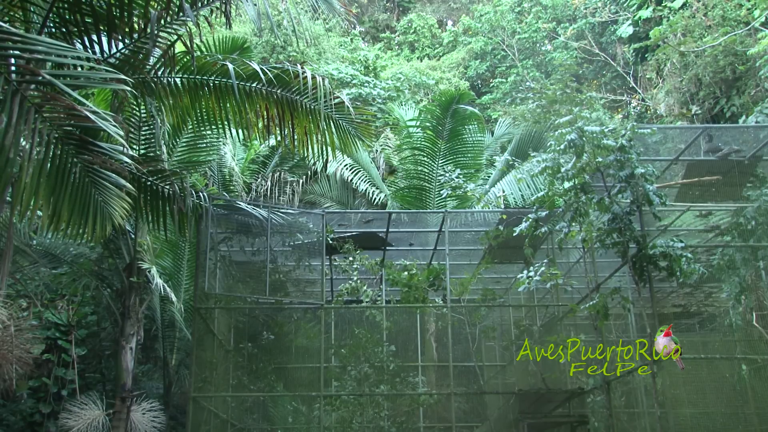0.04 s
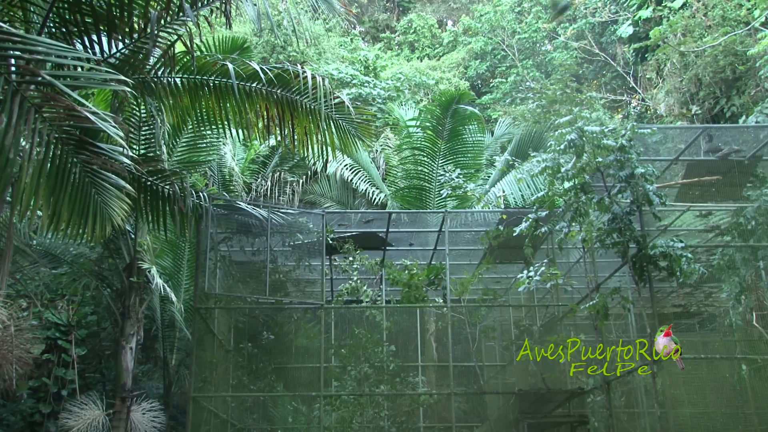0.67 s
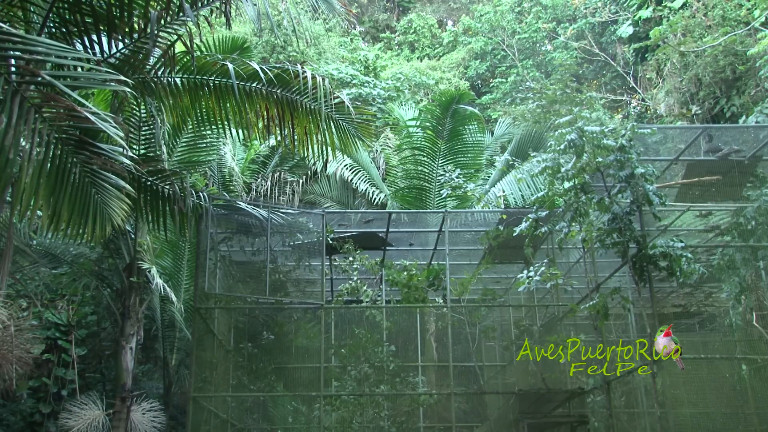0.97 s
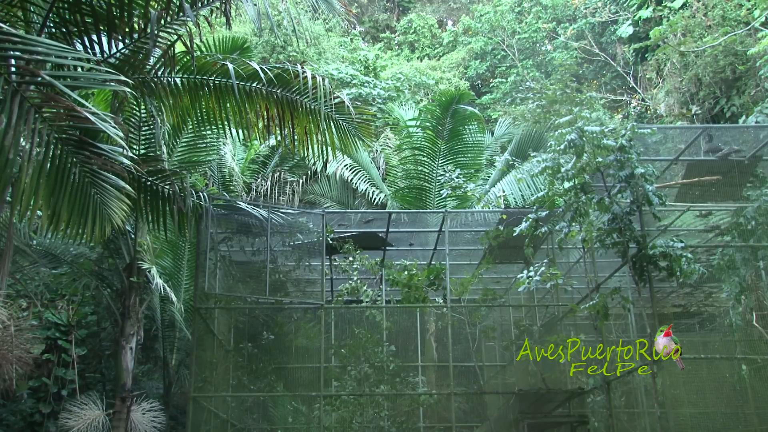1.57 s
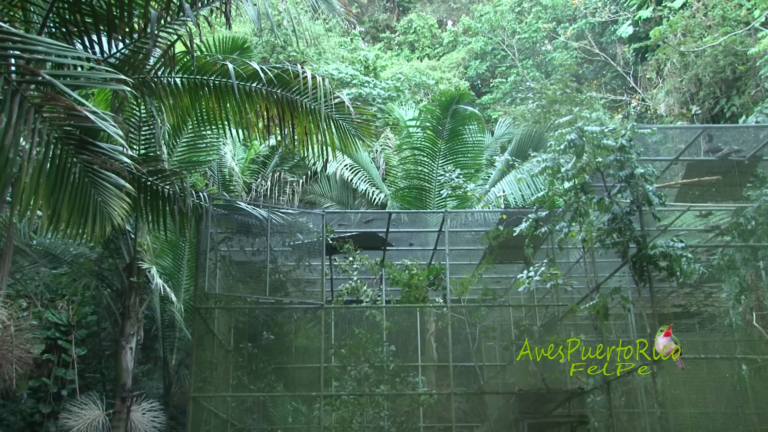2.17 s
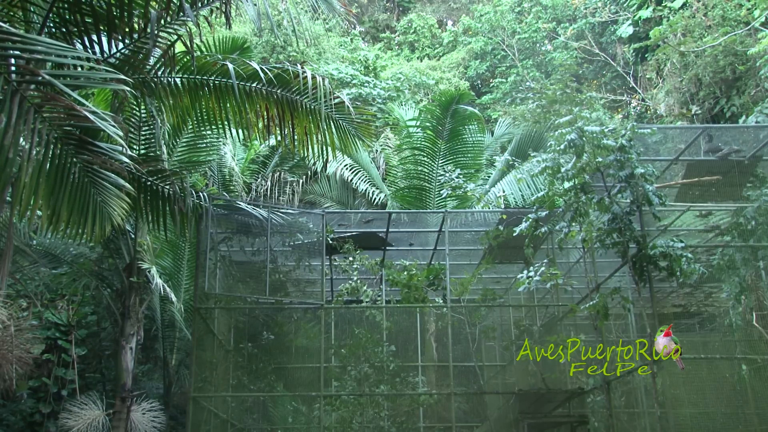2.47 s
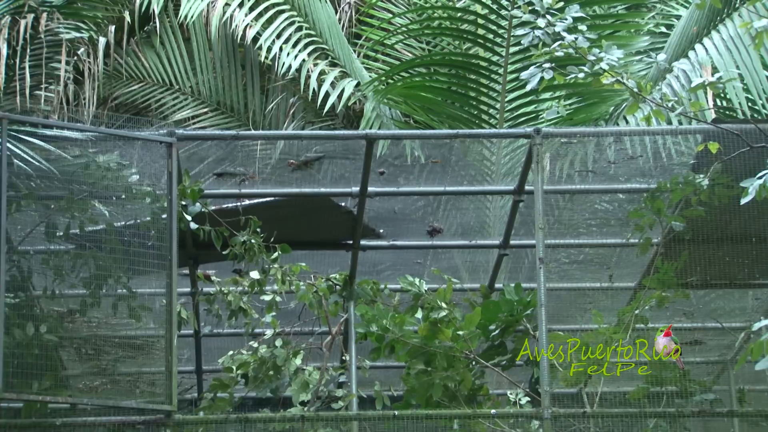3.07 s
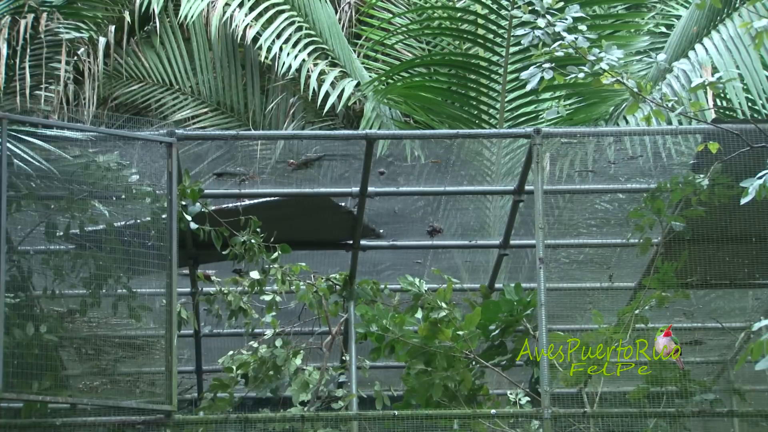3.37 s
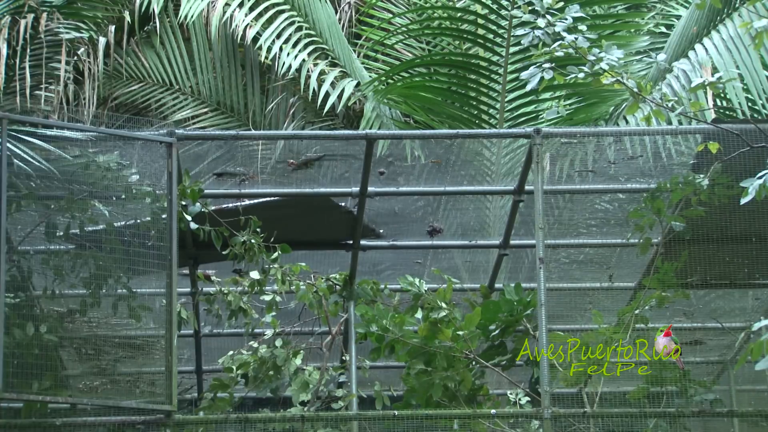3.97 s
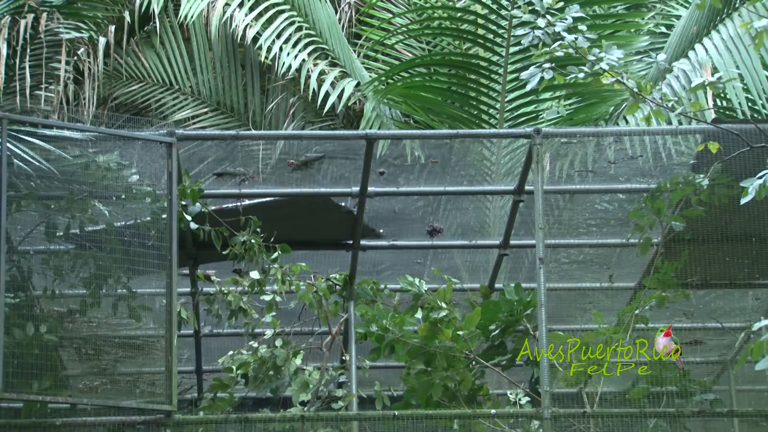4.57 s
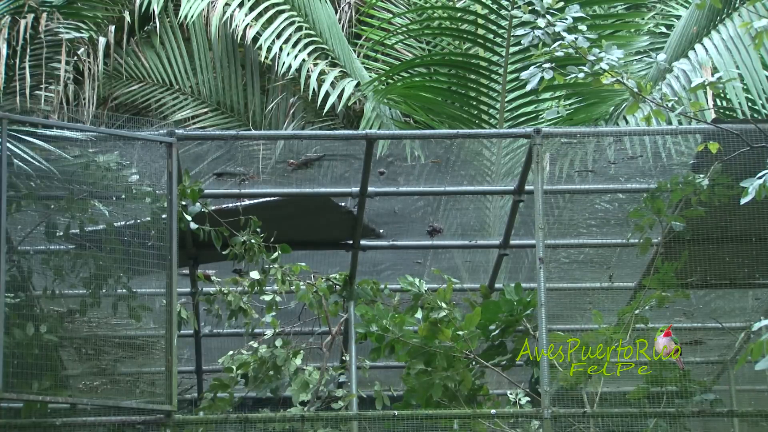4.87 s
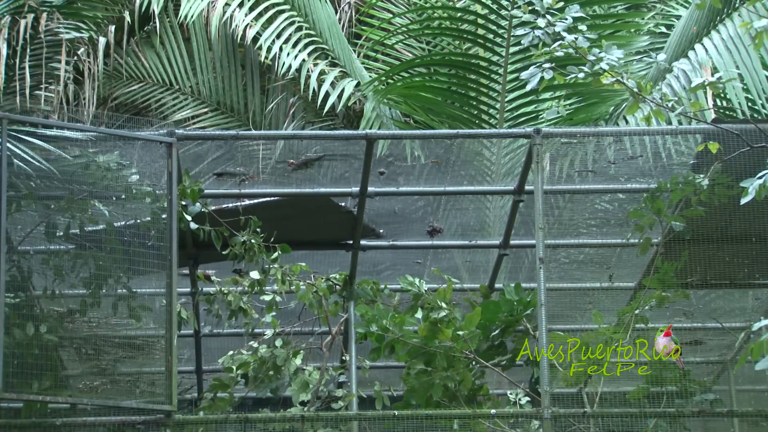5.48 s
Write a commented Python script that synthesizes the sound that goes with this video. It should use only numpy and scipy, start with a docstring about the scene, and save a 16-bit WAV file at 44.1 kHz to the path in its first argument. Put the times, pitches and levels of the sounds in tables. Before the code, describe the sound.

A soft forest hiss and the blurred chatter of distant parrots run throughout. Some way off, parrots give short harsh squawks, low wails and hoarse whoops, each echoing briefly among the trees. A few light drops tap on leaves in the first second or so, and once more near 5 seconds. At about 1.4 seconds a tree frog, close and slightly to the right, gives a loud, pure, level whistle, followed at 1.7 by a higher rising note. Two raspy parrot screeches come at 2.4 and 2.8 seconds, then a falling yelp at 3.2. The frog repeats its two notes at 3.7 and 4 seconds, again far louder than everything else. Another yelp follows at 4.3, and a parrot cry climbs in steps among squawks around 5.3. Small birds add faint, thin, very high notes here and there.

```python
"""Parrots and a tree frog in a wet forest

Some way off, an aviary of parrots squawks, wails, yelps and screeches: buzzing membranes, coloured by
throat and beak, with the trees answering each call. Close by, a tree frog's vocal sac twice sounds a level
whistle, then a rising one. Small birds lisp in the canopy, drops tap on leaves, the forest hisses softly."""
import sys
import numpy as np
from scipy import signal
from scipy.fft import rfft, irfft, next_fast_len
from scipy.io import wavfile
from scipy.ndimage import uniform_filter1d, map_coordinates

SR = 44100
rng = np.random.default_rng(int(sys.argv[2]) if len(sys.argv) > 2 else 0)


def persist_wave(psi):
    """Save psi, clipped to +-1, as 16-bit WAV."""
    counts = np.round(np.clip(psi, -1, 1) * 32767).astype(np.int16)
    wavfile.write(sys.argv[1], SR, np.atleast_2d(counts).T)


N = 244314

# stereo width of the ambience: f/Hz, left-right correlation
STEREO_LIKENESS = [(60, 1), (150, 0.46), (600, 0.7), (1500, 0.14), (8000, 0.59)]
# reverb of the trees at full length: f/Hz, t60/s
TREE_DECAY = [(200, 0.33), (1200, 0.49), (2000, .7), (2780, 1.25), (4000, .75), (6000, 0.72), (12000, 0.2)]
# EQ of the forest hiss: f/Hz, level/dB
HISS_EQ = [(15, -22), (25, -16), (81, -2.5), (180, -8), (539, -2), (1450, -7), (1610, 1.5), (1990, -8.5),
           (2530, -10), (3310, -35.5), (4810, -16.5), (8200, -34), (11000, -33), (13600, -35),
           (14800, -60.5)]
# EQ of the far chatter: f/Hz, level/dB
CHATTER_EQ = [(200, -33), (550, -13), (1250, 2), (2100, -2), (2650, 3), (3200, -0.5), (5500, -6),
              (8500, -11.5), (12000, -33)]
# fader ride of the far chatter: t/s, level/dB
CHATTER_RIDE = [(0, -53.5), (.3, -58), (.5, -48), (.85, -52.5), (1.25, -54), (1.901, -48.5), (2.249, -51.5),
                (2.55, -43), (2.8, -42), (3.151, -48.5), (3.602, -58), (3.999, -53.5), (4.3, -44.5),
                (4.7, -53), (5.051, -45.5), (5.2, -50.5), (5.54, -63.5)]
# pan of the flock's sound: t/s, left minus right/dB
FLOCK_PAN = [(0, -4.5), (1.201, -3), (2, -3), (2.6, -2), (3, -3), (3.25, 0), (4.3, -0.7), (4.9, -0.6),
             (5.4, 0)]
# a parrot's throat: f/Hz, level/dB
THROAT_EQ = [(300, -14), (550, -2), (900, -3), (1300, 0.5), (2000, 5.5), (2750, 6), (3500, 2), (5000, 1.5),
             (6800, -9), (8500, -19), (11000, -33), (15000, -47.5)]
# harsh squawks: t/s, length/s, pitch/Hz, level/dB, roughness, beak/Hz, brightness/(dB per octave)
SQUAWKS = [ (0.124, 0.12, 1138, -50, 0.92, 2500, -38), (0.341, 0.07, 845, -48, 0.87, 1600, -5),
           (0.614, 0.12, 1302, -47, 0.74, 2540, -4), (1.299, 0.048, 1029, -47, 0.5, 2360, -5),
           (1.359, 0.19, 1050, -42.5, 0.92, 2930, 0), (1.632, 0.19, 1017, -40, 0.74, 2450, -1.5),
           (1.933, 0.031, 990, -41, 0.2, 2070, -10), (1.96, 0.036, 1061, -41, 0.4, 2160, 1),
           (1.995, 0.0506, 991, -36, 0.35, 2680, -1), (2.052, 0.14, 1000, -53, 0.52, 3950, 4),
           (2.466, 0.08, 1320, -44, 0.5, 1320, 1), (2.618, 0.11, 1310, -51, 0.39, 1300, -20),
           (3.717, 0.17, 1230, -47, 0.6, 4500, -5.5), (4.517, 0.034, 1280, -44.5, 0.72, 2370, 5.5),
           (4.981, 0.056, 946, -41, 0.92, 1890, 0), (5.332, 0.061, 865.5, -38, 0.88, 1800, 1),
           (5.386, 0.11, 1067, -44, 0.93, 3230, 5)]
# drops on leaves: t/s, level/dB, knock trim/dB
DROPS = [(0.202, -37.5, -24), (0.24, -40.5, -8.5), (0.255, -33.5, -18), (0.3247, -37, -15.5),
         (0.3668, -41.5, -15), (0.933, -38.5, -16.5), (1.004, -37, -28.5), (1.0684, -44, -10.5),
         (1.0831, -41, -16.5), (5.0631, -36.5, -23)]
# a drop's splash: f/Hz, level/dB
SPLASH_EQ = [(300, -52), (2000, 5.5), (3500, 1), (8000, -8), (14000, -29)]
# modes of an average leaf: f/Hz, level/dB, t60/s
LEAF_MODES = [(590, 0, 0.06), (1220, 7, 0.03), (1700, 2, 0.04)]
# thin notes of small birds: t/s, length/s, start/Hz, end/Hz, level/dB
LISPS = [(0.371, 0.034, 8460, 7450, -40), (1.583, 0.19, 8430, 5400, -43), (2.267, 0.086, 8140, 7400, -35.5),
         (2.687, 0.063, 8850, 8940, -39.5), (3.006, 0.14, 9900, 9470, -46.5),
         (4.468, 0.093, 8270, 5980, -32.5), (4.653, 0.084, 9040, 8790, -39)]
# low wails: t/s, length/s, start/Hz, held pitch/Hz, drop as a share of it, level/dB, roughness, beak/Hz
WAILS = [(0.528, .24, 560, 633, 0.27, -46, 1.15, 1160), (1.691, 0.13, 643, 586, 0.51, -41, 0.25, 1200),
         (2.754, 0.13, 648, 683, 0.11, -37.5, 0.38, 1580),
         (3.302, 0.1, 577.5, 596.7, 0.17, -44.5, 0.85, 1180),
         (4.038, .165, 537.6, 685.5, 0.33, -40.5, 0.27, 1900),
         (4.724, 0.24, 494.6, 544.6, 0.094, -44.5, 0.55, 1390)]
# whoops: t/s, length/s, start/Hz, end/Hz, level/dB, roughness, beak/Hz, brightness/(dB per octave)
WHOOPS = [(1.013, 0.066, 1275, 1300, -44.5, 0.31, 2660, -3),
          (1.091, 0.12, 1315, 1355, -47.5, 0.48, 2710, -2), (2.308, .22, 930, 1350, -50, 0.92, 2560, -36),
          (4.883, 0.094, 815, 1053, -47, 0.32, 5000, -1)]
# the frog's level whistles: t/s, attack/s, level/dB, opening accent/dB, second harmonic/dB
FROG_WHISTLES = [(1.357, 0.013, -13, 0, -27), (3.688, 0.01, -17.5, 3, -22)]
# the frog's rising notes: t/s, length/s, opening trim/dB, level/dB
FROG_SWEEPS = [(1.659, 0.153, -12.5, -16), (3.996, 0.147, -4.5, -17)]
# brief high tones (two rows of frog overtone, then parrot pipes): t/s, length/s, pitch/Hz, level/dB
HIGH_TONES = [(1.378, 0.045, 3170, -40), (1.385, 0.034, 2950, -44), (1.617, 0.058, 3150, -47),
              (1.693, 0.04, 3175, -40), (1.928, 0.05, 3130, -44), (1.997, 0.068, 2925, -44),
              (4.204, 0.046, 2128, -38.5), (4.258, 0.056, 2150, -48.5), (4.718, 0.15, 3733, -61.5)]
# soft low bumps: t/s, level/dB
BUMPS = [(2.021, -49), (2.463, -58)]
# screeches: t/s, length/s, pitch/Hz, level/dB, swell/dB, roughness, brightness/(dB per octave)
SCREECHES = [(2.436, 0.23, 940, -31, 7.5, 0.82, 0.3), (2.83, .2, 930, -33.6, 6, 0.74, -0.6)]
# the throat with the beak wide open: f/Hz, level/dB
GAPE_EQ = [(300, -26.5), (600, -22), (950, -17.5), (1300, -22), (1520, -24), (1850, -7.5), (2300, -1.5),
           (2800, -3.5), (3250, -6.5), (3600, -7.5), (4150, -13.5), (4750, -6), (5500, -12), (6900, -14.5),
           (8500, -25.5), (11000, -40), (15000, -61)]
# falling yelps, one curve each: t/s, pitch/Hz, level/dB, roughness
YELPS = [
    [(3.217, 1439, -37, 0.45), (3.24, 1365, -39, 0.22), (3.271, 1290, -38.5, 0.18),
     (3.287, 1325, -35.5, 0.14), (3.305, 1290, -35, 0.18), (3.321, 1250, -32.5, 0.25),
     (3.333, 1235, -35, 0.68), (3.35, 1270, -40.5, 0.65)],
    [(4.235, 1780, -49, 0.3), (4.25, 1583, -44, 0.35), (4.278, 1455, -37.5, 0.3), (4.292, 1449, -37, 0.34),
     (4.308, 1420, -37.5, 0.38), (4.335, 1420, -34.5, 0.38), (4.352, 1390, -35.5, 0.3),
     (4.372, 1385, -38, 0.27)],
]
# tone of each yelp: beak/Hz, beak gain/dB, brightness/(dB per octave), opening rasp/dB
YELP_COLOURS = [(6200, 9, 3, -34.5), (6140, 13, -4, -58)]
# the windpipe ringing under a yelp: f/Hz, level/dB
YELP_WINDPIPE = [(1000, 0), (1270, 5), (1450, 0), (2300, 0), (2650, 6), (3200, -1), (4300, 2), (5000, 0)]
# a cry that climbs in steps: t/s, pitch/Hz, level/dB, roughness
CLIMB = [(5.18, 820, -55, .3), (5.23, 860, -52, .3), (5.258, 1110, -45, .35), (5.292, 1150, -48, .45),
         (5.32, 1300, -42, .32), (5.352, 1340, -42, .4), (5.366, 1610, -37, .2), (5.388, 1670, -39, .3)]
# the windpipe under that cry: f/Hz, level/dB
CLIMB_WINDPIPE = [(850, 13), (1150, 5), (1600, -3), (2300, 0), (2700, -1), (3250, 4), (3900, -3)]

TOP_HZ = 14850  # ceiling of the harmonics and of the mix


def amp(db):
    """Decibels to gain."""
    return 10 ** (np.asarray(db) / 20)


def unit(x):
    """Scaled to rms 1."""
    return x / np.sqrt(np.mean(x ** 2) + 1e-20)


def along(points, hz):
    """Read a curve over frequency on a log axis."""
    f, v = np.transpose(points)
    return np.interp(np.log(hz + 1), np.log(f + 1), v)


def progress(length):
    """From 0 to 1 over a call of this length."""
    return np.linspace(0, 1, int(length * SR))


def noise(n):
    """Up to a second of fresh white noise."""
    return rng.standard_normal(SR)[:n]


def wobble(rate, n):
    """A smooth random curve, rate knots a second."""
    return map_coordinates(rng.standard_normal(size=4096), [np.arange(n) * rate / SR], mode="wrap")


def fade(n, rise, fall):
    """A gate with soft ends, timed in seconds."""
    t = np.arange(n) / SR
    fade_in = np.sin(np.pi / 2 * np.clip(t / rise, 0, 1))
    return fade_in * np.sin(np.pi / 2 * np.clip(t[::-1] / fall, 0, 1))


def filtered(x, response):
    """x times a response of frequency."""
    n = x.shape[-1]
    m = next_fast_len(n + SR // 20)
    return irfft(rfft(x, m) * response(np.fft.rfftfreq(m, 1 / SR)), m)[..., :n]


def eq(x, curve):
    """Colour x with a curve of f/Hz, level/dB."""
    return filtered(x, lambda hz: amp(along(curve, hz)))


def add(track, s, sound):
    """Mix a sound into a track at time s."""
    part = track[..., max(round(s * SR), 0):][..., :sound.shape[-1]]
    part += sound[..., :part.shape[-1]]


def panned(x, lean_db):
    """Mono to stereo, louder on the left by lean_db."""
    return np.array([x * amp(lean_db / 2), x * amp(-lean_db / 2)]) / np.cosh(lean_db * np.log(10) / 40)


def placed(x, lean_db, lead_s):
    """From one side: the left ear gets it louder by lean_db and earlier by lead_s."""
    ears = np.array([[1], [-1]])
    return filtered(panned(x, lean_db), lambda hz: np.exp(1j * np.pi * hz * lead_s * ears))


def flock_pan(pair):
    """The flock's sound leans right at first, then is heard centred."""
    lean_db = np.interp(np.arange(N) / SR, *np.transpose(FLOCK_PAN))
    return pair * panned(np.ones(N), lean_db)


def spread(pair):
    """Two unrelated noises become one diffuse stereo sound."""
    turn = lambda hz: np.arccos(np.clip(along(STEREO_LIKENESS, hz), -1, 1)) / 2
    mid, side = filtered(pair, lambda hz: np.array([np.cos(turn(hz)), np.sin(turn(hz))]))
    return np.array([mid + side, mid - side])


def scatter(x, shorten=1):
    """Trunks and foliage throw a sound back; each frequency dies at its own speed."""
    hz, t, bands = signal.stft(rng.standard_normal((2, SR)), SR, nperseg=256)
    decay = amp(-60 * t * shorten / along(TREE_DECAY, hz)[:, None])
    tail = spread(signal.istft(bands * decay, SR, nperseg=256)[1])
    predelayed = np.pad(x, (SR // 250, 0))[None]
    return signal.fftconvolve(predelayed, tail / np.linalg.norm(tail[0]), axes=1)[:, :N]


def forest():
    """The bed: a soft hiss of leaves and water under the blurred chatter of parrots farther away."""
    hiss = unit(eq(spread(rng.standard_normal((2, N))), HISS_EQ))
    breeze = amp(-55.5 + 0.8 * wobble(3, N))
    bands = signal.stft(rng.standard_normal((2, N)), nperseg=512)[2]
    patches = uniform_filter1d(rng.standard_normal(bands.shape[1:]), size=3, axis=0)
    patches = unit(uniform_filter1d(patches, size=14, axis=1))  # voice-like blots in pitch and time
    babble = signal.istft(bands * amp(3.5 * patches), nperseg=512)[1][:, :N]
    chatter = unit(eq(spread(babble), CHATTER_EQ))
    ride_db = np.interp(np.arange(N) / SR, *np.transpose(CHATTER_RIDE)) + 2.06 * wobble(9.8, N)
    return breeze * hiss * amp([[-1.2], [1.2]]) + flock_pan(amp(ride_db) * chatter)


def syrinx(pitch, rough, jitter=0.0311, waver=0.01004, rasp_db=1.5, shimmer_db=3):
    """A parrot's membranes buzz (rough 0) and break into chaos when forced (rough 1)."""
    n, rough = len(pitch), np.clip(rough, 0, 1)
    unsteady = 1 + jitter * rough * wobble(700, n) + waver * wobble(88.36, n)
    phase = 2 * np.pi * np.cumsum(pitch * unsteady) / SR
    orders = np.arange(1, int(TOP_HZ / pitch.max()) + 1)[:, None]
    shimmer = amp(shimmer_db * wobble(69.54, n * len(orders))).reshape(-1, n)  # one swell per harmonic
    buzz = unit(np.sum(shimmer * np.cos(orders * (phase + orders)), axis=0))
    chaos = unit(noise(n) * (1 + np.cos(phase)))  # a puff in each cycle
    return (np.sqrt(1 - rough ** 2) * buzz + rough * chaos) * amp(rasp_db * rough * wobble(185.8, n))


def throat(source, beak_hz, bright_db, beak_db=7, octaves=0.28):
    """The colour of the throat, the resonance of the beak and a treble tilt of bright_db an octave."""
    beak = lambda hz: beak_db * np.exp(-(np.log2((hz + 1) / beak_hz) / octaves) ** 2)
    tilt = lambda hz: bright_db * np.log2(np.maximum(hz, 1900) / 1900)
    return unit(filtered(source, lambda hz: amp(along(THROAT_EQ, hz) + beak(hz) + tilt(hz))))


def voice(pitch, rough, beak_hz, bright_db):
    """The syrinx sounds through the throat and the beak."""
    return throat(syrinx(pitch, rough), beak_hz, bright_db)


def squawks(droop=0.042):
    """Harsh calls whose pitch droops a little at both ends."""
    track = np.zeros(N)
    for s, length, hz, db, rough, beak_hz, bright_db in SQUAWKS:
        u = progress(length)
        pitch = hz * (1 - droop * (2 * u - 1) ** 2)
        gate = fade(len(u), 0.15 * length, 0.22 * length)
        add(track, s, amp(db) * gate * voice(pitch, rough, beak_hz, bright_db))
    return track


def drops():
    """Each drop splashes and knocks its leaf, every leaf at its own pitch."""
    taps, t = np.zeros(N), np.arange(SR // 8) / SR
    for s, db, knock_db in DROPS:
        splash = unit(eq(noise(len(t)), SPLASH_EQ)) * amp(-60 * t / 0.1)
        tuning = np.exp(0.1 * rng.standard_normal())
        knock = sum(amp(level - 60 * t / t60) * np.sin(2 * np.pi * hz * tuning * t)
                    for hz, level, t60 in LEAF_MODES)
        add(taps, s, amp(db - 7.5) * (splash + amp(knock_db + 15) * knock))
    return panned(taps, lean_db=-3) + amp(-10) * scatter(taps, shorten=3)


def small_birds(tremble=0.022):
    """High sliding notes, blurred by the canopy."""
    notes = np.zeros(N)
    for s, length, start, end, db in LISPS:
        n = int(length * SR)
        pitch = np.geomspace(start, end, n) * (1 + tremble * wobble(900, n))
        tone = unit(np.sin(2 * np.pi * np.cumsum(pitch) / SR))
        add(notes, s, amp(db) * fade(n, 0.032, 0.0039) * tone)
    return amp(-27) * notes + amp(-16.5) * scatter(notes)


def wails(hold_s=0.012, drop_s=0.036, swell_db=7, growl_hz=83.6, growl_depth=0.88):
    """Low calls rattle and swell into a held note, then drop; the beak's resonance falls with them."""
    track = np.zeros(N)
    for s, length, start, held, drop, db, rough, beak_hz in WAILS:
        t, turn = length * progress(length), length - drop_s
        before = np.clip(1 - t / (turn - hold_s), 0, 1)  # 1 to 0 on the way to the held note
        after = np.sin(np.pi / 2 * np.clip((t - turn) / drop_s, 0, 1)) ** 2  # 0 to 1 through the drop
        rattle = np.sin(2 * np.pi * growl_hz * t + wobble(40, len(t)))
        growl = 1 + growl_depth * np.sqrt(before) * rattle
        pitch = held * (1 - drop * after) + (start - held) * before
        source = growl * syrinx(pitch, rough)
        second_harmonic = unit(np.sin(4 * np.pi * np.cumsum(pitch) / SR))
        core = amp(-4.5) * np.clip(1 - rough, 0, 1) ** 2 * growl * second_harmonic
        wide = throat(source, beak_hz, bright_db=-10.5, beak_db=12.5, octaves=0.25)
        closing = throat(source, beak_hz * (1 - drop), bright_db=-18, beak_db=6, octaves=0.6)
        level = amp(db - swell_db * np.sqrt(before) - 1.4 * after) * fade(len(t), 0.0072, 0.00087)
        add(track, s, level * ((1 - after) * wide + after * closing + core))
    return track


def hoarse(pitch, rough, depth=0.075, rate_hz=330):
    """A strained voice trembles quickly in pitch, which frays its overtones."""
    return pitch * (1 + depth * rough * wobble(rate_hz, len(pitch)))


def whoops():
    """Hoarse calls that glide up and level off."""
    track = np.zeros(N)
    for s, length, start, end, db, rough, beak_hz, bright_db in WHOOPS:
        u = progress(length)
        pitch = end - (end - start) * (1 - u) ** 2.1
        gate = fade(len(u), length / 5, length / 5)
        add(track, s, amp(db) * gate * voice(hoarse(pitch, rough), rough, beak_hz, bright_db))
    return track


def vocal_sac(pitch, attack_s, sag_db_per_s, flutter_db, second_db, third_db):
    """The frog's sac radiates an almost pure, fluttering tone; the fundamental sags, the overtones hold."""
    n, phase = len(pitch), 2 * np.pi * np.cumsum(pitch) / SR
    t = np.arange(n) / SR
    fundamental = amp(-sag_db_per_s * t) * np.sin(phase)
    tone = fundamental + amp(second_db) * np.sin(2 * phase) + amp(third_db) * np.sin(3 * phase)
    flutter = unit(amp(flutter_db * np.tanh(wobble(133.3, n))))
    return (1 - np.exp(-t / attack_s)) * np.sqrt(2) * tone * flutter * fade(n, 0.0014, 0.005)


def frog_whistles(hz=1541, length_s=0.11, accent_s=0.013):
    """The first note starts sharp, settles on its pitch and lifts as it ends."""
    track, t = np.zeros((2, N)), length_s * progress(length_s)
    pitch = hz + 65 * np.exp(-t / 0.0199) + 55 * np.exp((t - length_s) / 0.011)
    accent = np.exp(-(2 * (t / accent_s - 1)) ** 2)
    for s, attack_s, db, accent_db, second_db in FROG_WHISTLES:
        note = vocal_sac(pitch, attack_s, sag_db_per_s=117.5, flutter_db=1,
                         second_db=second_db, third_db=second_db - 18.5)
        add(track, s, placed(amp(db + accent_db * accent) * note, lean_db=-3.7, lead_s=9.5e-5))
    return track


def frog_sweeps(from_hz=2295, toward_hz=3046, glide_s=0.076, opening_s=0.025):
    """The second note glides up; the voice catches fully only after a soft opening."""
    track = np.zeros((2, N))
    for s, length, opening_db, db in FROG_SWEEPS:
        t = length * progress(length)
        pitch = toward_hz - (toward_hz - from_hz) * np.exp(-t / glide_s)
        note = vocal_sac(pitch, 0.0006, sag_db_per_s=80, flutter_db=2.6, second_db=-54, third_db=-47)
        opening = np.clip((opening_s - t) / 0.0054 + 1, 0, 1)
        add(track, s, placed(amp(db + opening_db * opening) * note, lean_db=-4, lead_s=-4.5e-5))
    return track


def frog():
    """Two notes a call; the rising one beats against its echoes from the nearest leaves."""
    whistles, sweeps = frog_whistles(), frog_sweeps()
    leaf_send = (amp(-14) * whistles + amp(-5) * sweeps).mean(axis=0)
    tree_send = (amp(-4) * whistles + sweeps).mean(axis=0)
    leaves = np.array([scatter(leaf_send, shorten=14)[side] for side in range(2)])
    return whistles + sweeps + leaves + amp(-27) * scatter(tree_send, shorten=1.3)


def high_tones():
    """Brief clear high tones: a raspy overtone on the frog's first whistle, then parrot pipes."""
    track = np.zeros(N)
    for s, length, hz, db in HIGH_TONES:
        n = int(length * SR)
        note = voice(np.full(n, hz), rough=0, beak_hz=hz, bright_db=-32.5)
        add(track, s, amp(db) * fade(n, 0.014, 0.027) * note)
    return track


def bumps(hz=95.5, t60=0.16):
    """Faint, dull knocks in the bass."""
    track, t = np.zeros(N), np.arange(SR // 4) / SR
    for s, db in BUMPS:
        add(track, s, amp(db - 60 * t / t60) * fade(len(t), 0.0087, 0.02) * np.sin(2 * np.pi * hz * t))
    return track


def screeches(peak_share=0.66, catch_s=0.08, rise_per_db=0.006):
    """Beak wide open, a pure rasp finds its pitch; more effort makes it louder and higher."""
    track = np.zeros(N)
    for s, length, hz, db, swell_db, rough, bright_db in SCREECHES:
        u = progress(length)
        effort_db = -swell_db * np.abs(u - peak_share) / peak_share
        pitch = hz * np.exp(rise_per_db * (effort_db - effort_db.max()))
        rasp = rough + (1 - rough) * np.exp(-(u * length / catch_s) ** 2)
        gape = lambda f: amp(along(GAPE_EQ, f) + bright_db * np.log2(1 + f / 945))
        call = unit(filtered(syrinx(pitch, rasp), gape))
        add(track, s, amp(db + effort_db) * fade(len(u), 0.022, 0.011) * call)
    return track


def cry(rows, beak_hz, beak_db, bright_db, windpipe):
    """A hoarse call rings through the windpipe, following a curve of pitch, level and roughness."""
    times, *columns = np.transpose(rows)
    t = np.arange(times[0], times[-1], 1 / SR)
    pitch, db, rough = [np.interp(t, times, column) for column in columns]
    source = eq(syrinx(hoarse(pitch, rough), rough), windpipe)
    return amp(db) * fade(len(t), 0.0059, 0.013) * throat(source, beak_hz, bright_db, beak_db)


def yelps(rasp_s=0.045, rasp_hz=589):
    """A low rasp opens each falling cry."""
    track, n = np.zeros(N), int(rasp_s * SR)
    for rows, (beak_hz, beak_db, bright_db, rasp_db) in zip(YELPS, YELP_COLOURS):
        s = rows[0][0]
        add(track, s, cry(rows, beak_hz, beak_db, bright_db, YELP_WINDPIPE))
        rasp = voice(np.full(n, rasp_hz), rough=0.96, beak_hz=1400, bright_db=-7)
        add(track, s, amp(rasp_db) * fade(n, 0.005, rasp_s) * rasp)
    return track


def climb():
    """One parrot winds its voice up an octave, louder as it goes."""
    track = np.zeros(N)
    add(track, CLIMB[0][0], cry(CLIMB, beak_hz=2500, beak_db=10, bright_db=-3, windpipe=CLIMB_WINDPIPE))
    return track


def parrots(ring_hz=2740):
    """The flock bus: direct, off the cage and back from the trees; the nearer birds are drier."""
    yelping = yelps()
    far = squawks() + high_tones() + screeches()
    near = whoops() + wails() + climb()
    direct = placed(amp(-2) * far + amp(-1) * (near + yelping), lean_db=-1, lead_s=-2e-5)
    cage = scatter(far + amp(-5) * near + amp(-2) * yelping, shorten=2.6)
    trees = scatter(far + amp(-2) * near + amp(-6) * yelping)
    yelp_band = filtered(yelping, lambda hz: np.exp(-(np.log2((hz + 1) / ring_hz) / 0.2) ** 2))
    ring = scatter(yelp_band, shorten=1.8)  # the trees hold on to one band of a yelp
    return flock_pan(direct + amp(-6.5) * cage + amp(-8) * trees + amp(-5) * ring)


def scene():
    """All the voices over the forest bed."""
    return parrots() + frog() + small_birds() + drops() + bumps() + forest()


def record(dry):
    """A brick-wall low-pass on the mix."""
    return filtered(dry, lambda hz: hz < TOP_HZ)


dry = scene()
out = record(dry)
persist_wave(out)
```